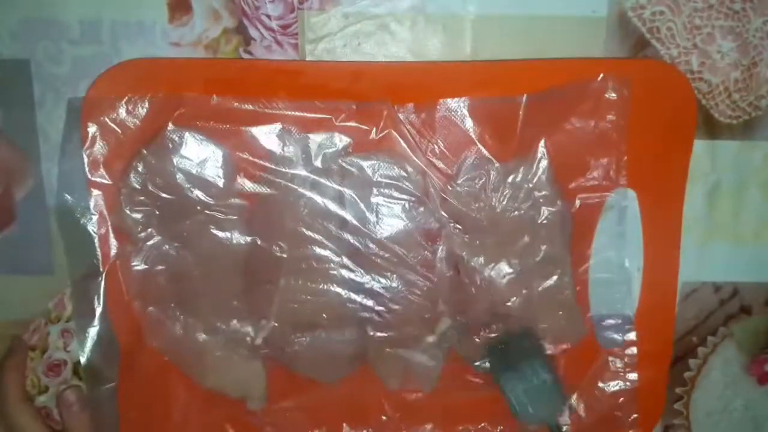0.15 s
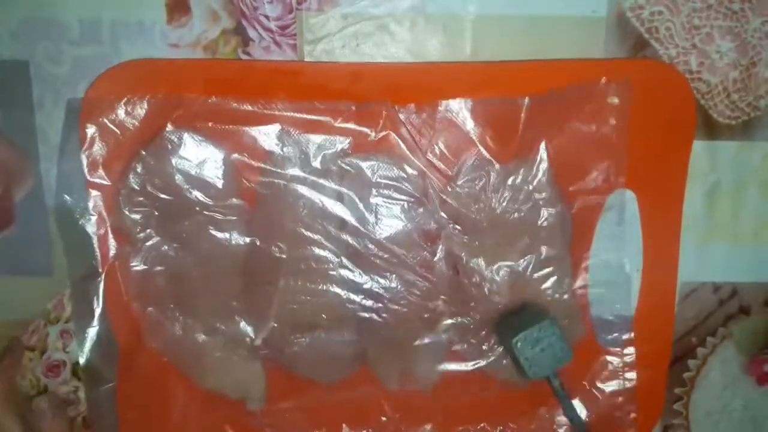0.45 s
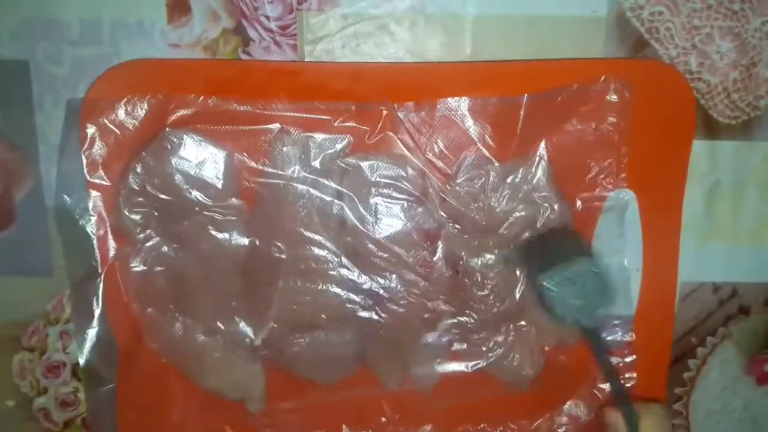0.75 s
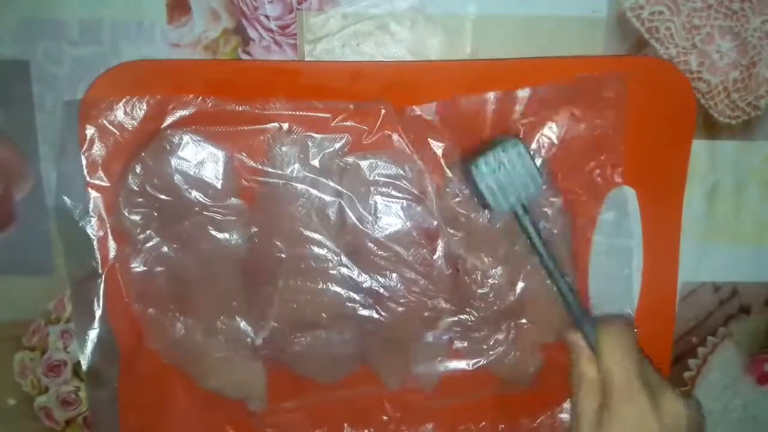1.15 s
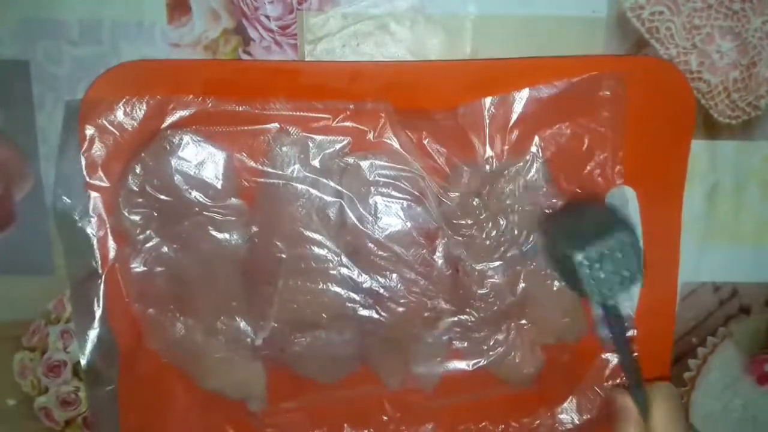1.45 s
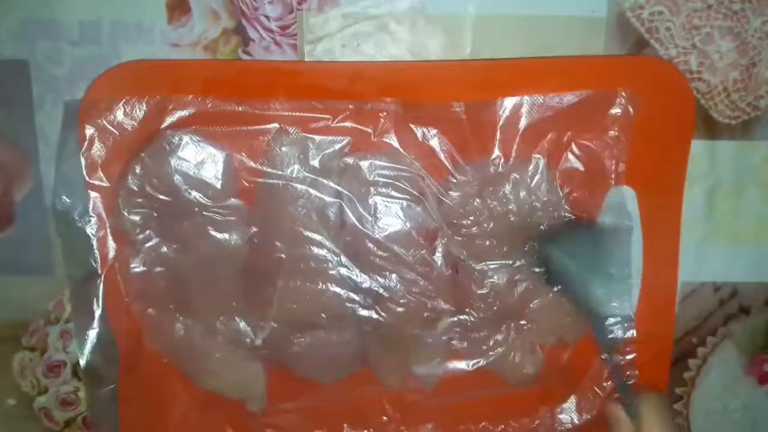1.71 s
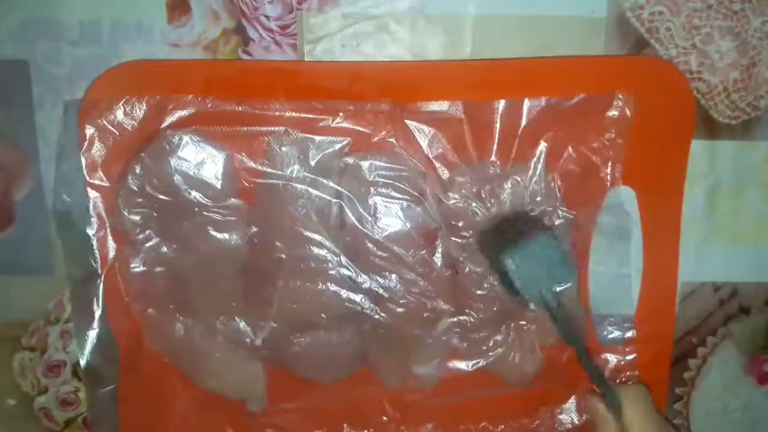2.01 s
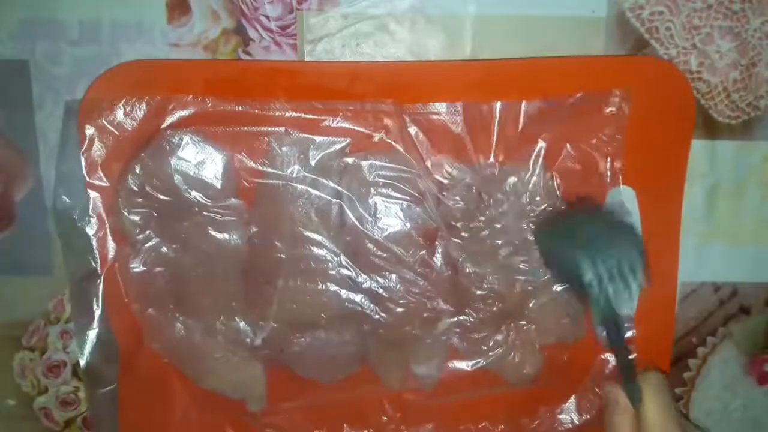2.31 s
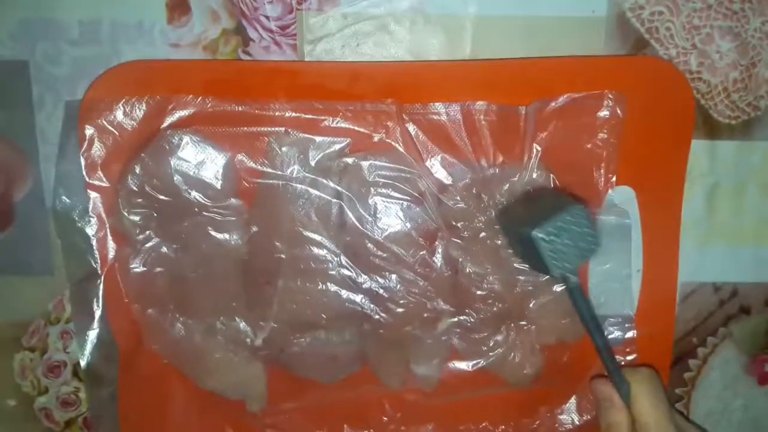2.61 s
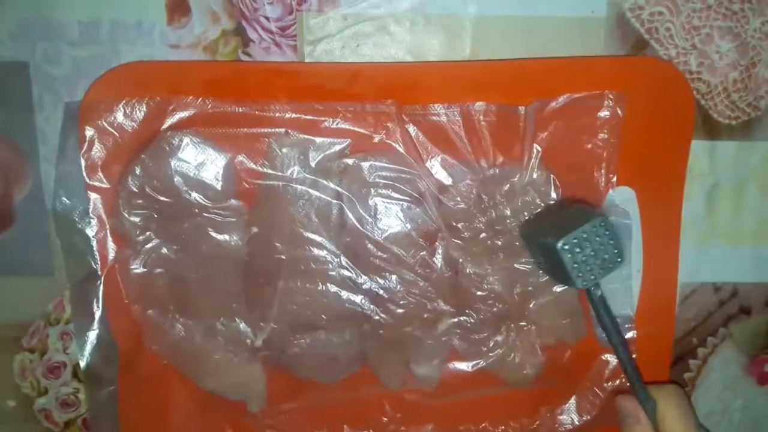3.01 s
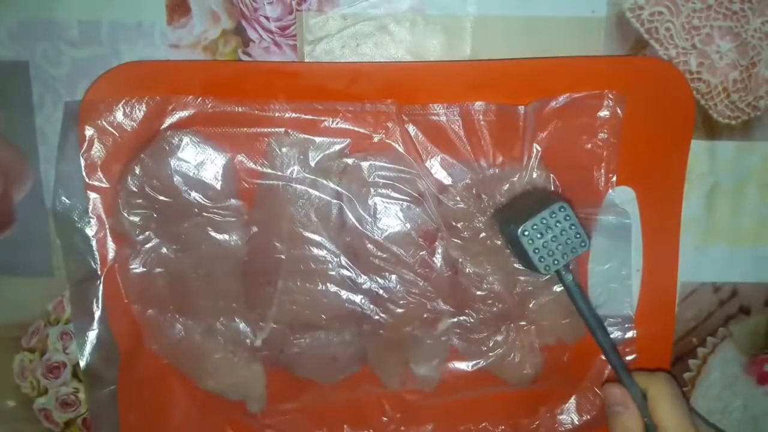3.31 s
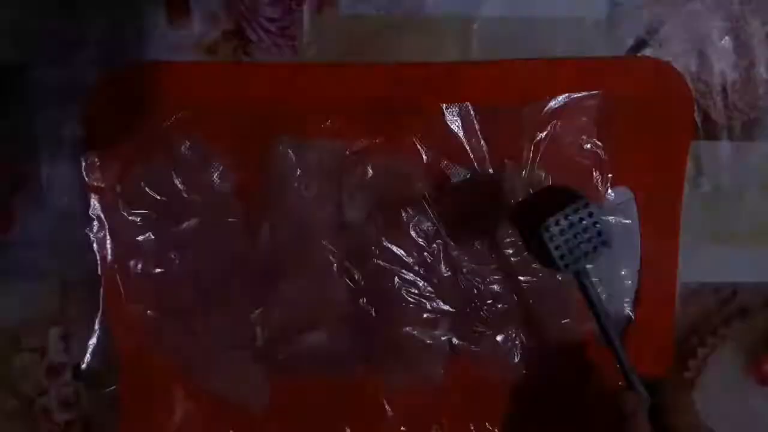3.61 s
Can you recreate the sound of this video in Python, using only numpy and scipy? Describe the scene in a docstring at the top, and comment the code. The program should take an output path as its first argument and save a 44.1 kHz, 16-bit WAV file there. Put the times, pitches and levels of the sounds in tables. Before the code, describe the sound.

Meat is pounded with a mallet at a fast, steady pace, each blow a plastic slap, a wet smack and a dull thump. The cutting board clatters once near the start. Heard up close in a quiet kitchen.

```python
"""Pounding chicken in a small kitchen

Close by, a metal mallet pounds chicken through a plastic bag on a plastic board, in quick even blows.
Each slaps the film, smacks into the meat a few milliseconds later and thumps the table beneath.
One catches the board and makes it clatter; the film ticks as the mallet lifts off."""
import sys
import numpy as np
from scipy import signal
from scipy.fft import rfft, irfft
from scipy.io import wavfile

SR = 44100
rng = np.random.default_rng(int(sys.argv[2]) if len(sys.argv) > 2 else 0)


def unload_audio(sound):
    """Save the sound as a 16-bit wav file, at the path given as the first command line argument."""
    columns = np.transpose(np.atleast_2d(sound))
    # keep every value between -1 and 1, then stretch to whole-number steps
    steps = np.round(np.clip(columns, -1, 1) * 32767)
    wavfile.write(sys.argv[1], SR, steps.astype(np.int16))


N = 165375

# Mallet blows. Each row: contact in seconds, the film's lead in seconds, film level in dB, smack level in dB,
# pitch of the board's brief ring in Hz, thump level in dB.
BLOWS = [(-.08, 0.0019, -26, -18.5, 1780, -19), (0.1263, 0.0028, -28.5, -18, 1720, -17.5),
         (.3200, .0015, -27.5, -18.5, 1870, -18), (0.5006, .0037, -39.5, -15, 1800, -16.5),
         (0.7282, 0.005, -29.5, -21, 966, -21), (0.9388, .0042, -27.5, -15.5, 1690, -15),
         (1.1452, 0.0086, -25, -16.5, 1880, -18.5), (1.359, 0.0036, -29.5, -15.5, 1880, -16.5),
         (1.5888, 0.0046, -32, -18, 1356, -17), (1.8233, 0.0024, -33, -18.5, 1756, -19),
         (2.0269, .0036, -30.5, -15.5, 1800, -14), (2.2447, 0.0039, -33, -18, 2100, -19.5),
         (2.4593, 0.0063, -30.5, -14.5, 2004, -15.5)]
# Board catches and film ticks. Each row: start in seconds, level in dB.
BOARD_CATCHES = [(.5030, -23.5)]
FILM_TICKS = [(0.5453, -36.5), (.5955, -50), (1.498, -55.5), (1.722, -54), (2.1294, -60), (2.377, -56.5),
              (2.5985, -57.5)]
# Modes of table and board. Each row: pitch in Hz, relative level in dB, seconds to fall 60 dB.
TABLE_MODES = [(60, -15, 0.18), (71.7, -26, 0.64), (95.6, -23.5, .3), (111.5, -21, 0.62),
               (129.24, 22, 0.066), (143.9, 14.5, 0.13), (165.4, 19.5, 0.058), (202.4, 0, 0.13),
               (229.8, -1.5, 0.066), (309, -1.5, 0.0836), (498, -10, .1)]
BOARD_MODES = [(292, 1, 0.1154), (420, 1.5, 0.15), (492.4, 4.5, 0.21), (532, -8, 0.092), (556, 2, .15),
               (690, -0.5, 0.14), (742, 4, 0.14), (831, -19, 0.1), (1036, -11, 0.1294), (1283, 1.5, 0.13),
               (1444, -9, 0.12)]
# Faint kitchen tones. Each row: pitch in Hz, level in dB.
HUM_TONES = [(145, -65.5), (198, -67), (1272, -69), (1560, -74), (2830, -74.5), (4300, -81.5)]
# The colour of each noise and of the echo. Each row: frequency in Hz, relative level in dB.
AIR_SPECTRUM = [(25, -18.5), (60, -11), (110, -7.5), (150, 0.5), (180, -13), (240, -8), (330, -9),
                (440, -6.5), (700, -11.5), (1000, -16.5), (1500, -15.5), (2300, -17.5), (3500, -26.5),
                (5500, -29.5), (8500, -37.5), (11000, -36), (13500, -31), (16000, -28.5)]
FILM_SPECTRUM = [(200, -20.5), (1000, 3), (2500, -6.5), (4000, -0.5), (7000, -2.5), (9300, -9),
                 (11000, -2.5), (15500, -12)]
SMACK_SPECTRUM = [(150, -15), (400, -3), (850, -1.5), (1300, 0.5), (1900, -0.5), (2300, 0), (2800, -6),
                  (3800, -13.5), (6000, -19), (9300, -26.5), (11000, -24), (16000, -25.5)]
SQUELCH_SPECTRUM = [(100, -20.5), (240, 4.5), (330, -3), (500, 1), (700, -9), (1200, -20.5), (4000, -46.5)]
CLATTER_SPECTRUM = [(200, -9), (330, -6), (500, 0), (900, 13), (1400, -11.5), (2200, -37.5), (4000, -46),
                    (16000, -54.5)]
TICK_SPECTRUM = [(300, -15.5), (2000, 0.5), (4000, -4), (9000, -12.5), (15000, -12.5)]
ECHO_SPECTRUM = [(60, -25.5), (160, -21), (260, -5.5), (350, -2.5), (600, -3), (1000, -4.5), (2000, -8),
                 (5000, -4.5), (9000, -5.5), (14000, -5)]
# The kitchen's decay. Each row: frequency in Hz, seconds to fall 60 dB.
ECHO_T60 = [(100, 1.18), (300, 0.286), (1000, 0.3559), (2000, 0.3144), (5000, 0.33), (10000, 0.2154),
            (16000, 0.3)]
# Direct sound at the microphones. Each row: frequency in Hz, left minus right in dB.
BALANCE = [(100, 2.5), (170, 1.5), (280, 0), (600, 3), (1500, 2.5), (4000, 3), (8000, -1), (13000, -2.5)]

BRUSH_S = .003  # the mallet brushes the bag this long before the slap
DIRECT_LIKENESS = .63  # correlation of left and right


def amp(db):
    """Decibels to gain."""
    return 10 ** (np.asarray(db) / 20)


def lookup(points, hz):
    """A table's value along a log-frequency axis."""
    f, value = np.transpose(points)
    return np.interp(np.log(hz + 1), np.log(f), value)


def add(mix, s, sound):
    """Mixes a sound in at s seconds, which may lie before the start."""
    start = round(s * SR)
    sound = sound[..., max(-start, 0):]
    part = mix[:, max(start, 0):][:, :sound.shape[-1]]
    part += sound[..., :part.shape[1]]


def stereo_noise(size, likeness=DIRECT_LIKENESS):
    """Noise that is partly alike at the two microphones."""
    left, other = rng.standard_normal((2, size))
    return np.array([left, likeness * left + np.sqrt(1 - likeness ** 2) * other])


def colour(x, spectrum, size=4096):
    """Minimum-phase filter with the given spectrum."""
    log_gain = np.log(amp(lookup(spectrum, abs(np.fft.fftfreq(size, 1 / SR)))))
    response = np.exp(np.conj(signal.hilbert(log_gain)))
    taps = np.fft.ifft(response).real[:size // 2]
    return signal.fftconvolve(x, taps[None], axes=1)[:, :x.shape[1]]


def burst(envelope, spectrum):
    """Shaped, coloured noise with the energy of 8 ms at unit level."""
    x = colour(stereo_noise(envelope.shape[-1]) * envelope, spectrum)
    return x / np.sqrt((x ** 2).mean(0).sum() / (.008 * SR))


def dying_noise(spectrum, t60_s):
    """A burst that starts at once and fades."""
    t = np.arange(SR // 8) / SR
    return burst(amp(-60 * t / t60_s), spectrum)


def ring(modes, rise_s):
    """Dying modes that swell over the time of contact."""
    t = np.arange(SR // 2) / SR
    swell = 1 - np.exp(-(t / rise_s) ** 2)
    return swell * sum(amp(db - 60 * t / t60) * np.sin(2 * np.pi * hz * t) for hz, db, t60 in modes)


def room_tone():
    """The kitchen's quiet air, with faint wavering tones."""
    t = np.arange(N) / SR
    air = colour(stereo_noise(N, likeness=.26), AIR_SPECTRUM)
    # Each phase wanders at random, in cycles for a 4 kHz tone.
    drifts = 5 * np.cumsum(rng.standard_normal((len(HUM_TONES), N)), 1) / np.sqrt(SR)
    hum = sum(amp(db) * np.sin(2 * np.pi * (hz * t + drift * np.sqrt(hz / 4000)))
              for (hz, db), drift in zip(HUM_TONES, drifts))
    return amp(-59.5) * air / air.std() + hum


def film_slap(lead_s, t60_s=.046):
    """A faint brush, then dense crackle while the head presses the bag flat, dying after contact."""
    t = np.arange(SR // 16) / SR - BRUSH_S
    grains = amp(3.5 * np.minimum(rng.exponential(1, len(t)), 4))
    brush = amp(-17) * (1 + t / BRUSH_S)
    press = amp(-60 * np.maximum(t - lead_s, 0) / t60_s)
    return burst(grains * np.where(t < 0, brush, press), FILM_SPECTRUM)


def smack(hz, hold_s=.0019, splat_t60_s=.016, pop_t60_s=.012):
    """The smack: a short wet splat and a brief pitched ring of the board."""
    t = np.arange(SR // 16) / SR
    splat = burst(amp(-60 * np.maximum(t - hold_s, 0) / splat_t60_s), SMACK_SPECTRUM)
    pop = -np.sin(2 * np.pi * hz * t) * amp(-60 * t / pop_t60_s)
    return amp(-4) * splat + amp(7) * pop


def meat_push(peak_s=.0022):
    """One soft pressure pulse as the meat gives way."""
    t = np.arange(SR // 50) / SR
    return amp(-8) * np.exp(-((t - peak_s) / (peak_s / 2)) ** 2)


def mallet_blow(lead_s, film_db, smack_db, smack_hz, thump_db):
    """Slap, smack and push, then the table's thump and a dull squelch of the meat."""
    out, contact_s = np.zeros((2, SR // 2)), BRUSH_S + lead_s
    add(out, 0, amp(film_db) * film_slap(lead_s))
    add(out, contact_s, amp(smack_db) * smack(smack_hz))
    add(out, contact_s, amp(thump_db) * meat_push())
    add(out, contact_s + .0018, amp(thump_db) * ring(TABLE_MODES, rise_s=.016))
    add(out, contact_s + .008, amp(thump_db - 13.5) * dying_noise(SQUELCH_SPECTRUM, t60_s=.03))
    return out


def kitchen(x, swell_s=.007, early_s=.054, early_db=3, echo_lean_db=1.18):
    """Direct sound a little off centre, then a diffuse echo, each band dying at its own speed."""
    size = SR * 2 // 3
    t, f = np.arange(size) / SR, np.fft.rfftfreq(size, 1 / SR)
    lean_db = lookup(BALANCE, np.fft.rfftfreq(SR, 1 / SR)) / 2
    direct = irfft(rfft(x, SR) * amp([lean_db, -lean_db]), SR)[:, :size]
    # The echo takes on the sound's broad colour.
    energy = np.cumsum((abs(rfft(x, size)) ** 2).mean(0))
    bins = np.arange(len(f))
    lo, hi = bins * 7 // 8, np.minimum(bins * 8 // 7 + 1, len(f) - 1)
    broad = np.sqrt(np.maximum(energy[hi] - energy[lo], 0) / (hi - lo))
    diffuse = rfft(stereo_noise(size, likeness=.18)) * broad * amp(lookup(ECHO_SPECTRUM, f))
    hz, frame_s, bands = signal.stft(irfft(diffuse, size), SR, nperseg=256)
    t60 = lookup(ECHO_T60, hz)[:, None]
    decay = amp(-60 * frame_s / t60) * np.sqrt(2 * np.log(1000) / (t60 * SR))  # unit energy
    tail = signal.istft(bands * decay, SR, nperseg=256)[1][:, :size]
    swell = (1 - np.exp(-(t / swell_s) ** 2)) ** 2
    # Near walls and cupboards return a dense first cluster.
    early = amp(early_db * (1 - np.tanh((t - early_s) / .0055)) / 2)
    return direct + tail * swell * early * amp([[echo_lean_db], [-echo_lean_db]])


def board_clatter():
    """Caught by the mallet, the plastic board rings and chatters on the table."""
    out = np.zeros((2, SR // 2))
    add(out, 0, ring(BOARD_MODES, rise_s=.0012))
    add(out, 0, amp(7.5) * dying_noise(CLATTER_SPECTRUM, t60_s=.063))
    return out


def film_tick():
    """The bag ticks as the mallet lifts off."""
    return dying_noise(TICK_SPECTRUM, t60_s=.008)


def scene():
    """Blows, clatter and ticks reach the microphones over the room tone."""
    mix = room_tone()
    for contact_s, lead_s, *voicing in BLOWS:
        add(mix, contact_s - lead_s - BRUSH_S, kitchen(mallet_blow(lead_s, *voicing)))
    for s, db in BOARD_CATCHES:
        add(mix, s, amp(db) * kitchen(board_clatter()))
    for s, db in FILM_TICKS:
        add(mix, s, amp(db) * kitchen(film_tick()))
    return mix


def record(dry):
    """The recorder's band ends at 16.1 kHz."""
    lowpass = signal.firwin(511, 16100, window=("kaiser", 9), fs=SR)
    return signal.oaconvolve(dry, lowpass[None], "same")


dry = scene()
out = record(dry)
unload_audio(out)
```